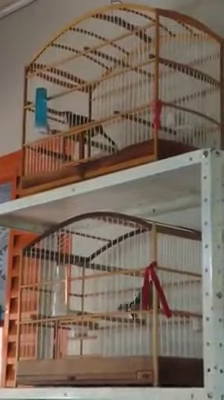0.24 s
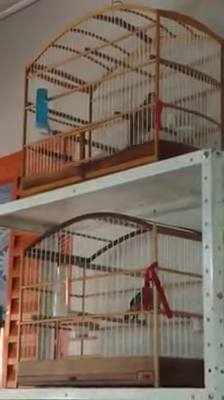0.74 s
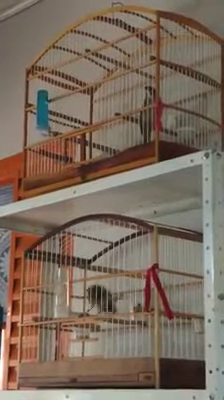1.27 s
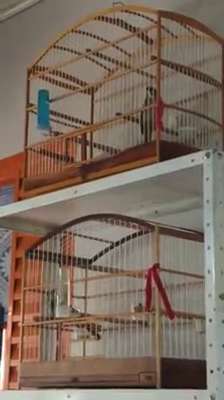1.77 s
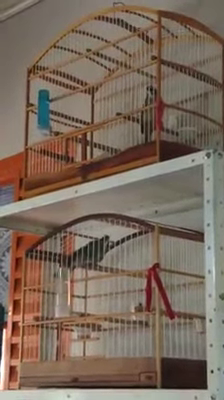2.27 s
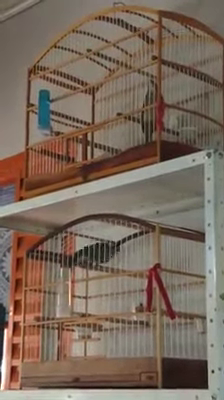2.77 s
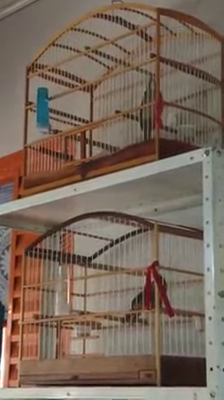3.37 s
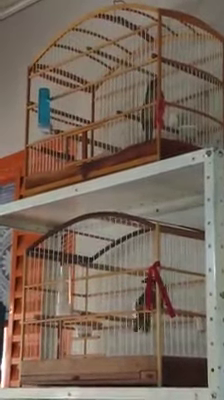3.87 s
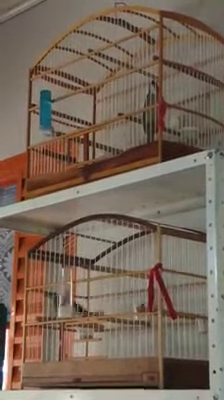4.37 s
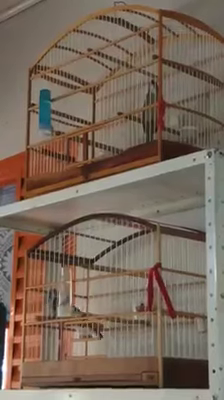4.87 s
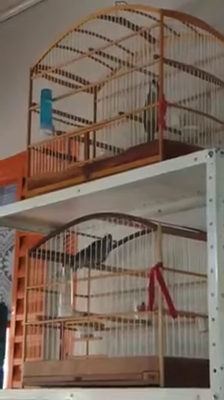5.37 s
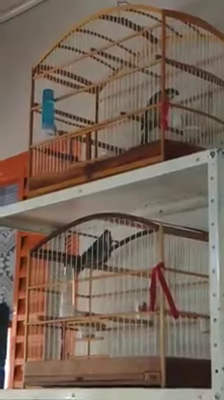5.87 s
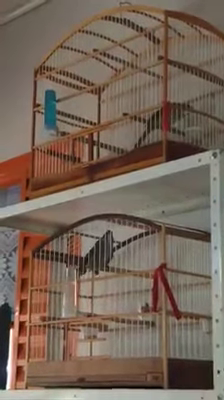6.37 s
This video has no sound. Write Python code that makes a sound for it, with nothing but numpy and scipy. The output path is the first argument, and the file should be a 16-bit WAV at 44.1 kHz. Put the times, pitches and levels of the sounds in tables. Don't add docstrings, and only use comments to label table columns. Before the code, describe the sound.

A brisk wing flutter fades at the start, then a caged bird gives one sharp falling chirp. Light claw taps and perch knocks follow. Midway comes a loud phrase: a buzzy note, then quick whistles sliding down, the last low and soft. After more hops, another single chirp. Close phone pickup in a bare, reverberant room, with muffled traffic hum outside.

```python
import sys
import numpy as np
from scipy import signal
from scipy.fft import rfft, irfft, next_fast_len
from scipy.io import wavfile
from scipy.ndimage import uniform_filter1d

SR = 44100
rng = np.random.default_rng(int(sys.argv[2]) if len(sys.argv) > 2 else 0)


def persist_wave(psi):
    counts = np.round(np.clip(psi, -1, 1) * 32767).astype(np.int16)
    wavfile.write(sys.argv[1], SR, np.atleast_2d(counts).T)


def boost_factor(decibels):
    exponent = np.asarray(decibels, float) / 20
    return 10 ** exponent


N = 292824


def at_hz(points, hz):
    points = np.array(points)
    return np.interp(np.log(np.maximum(hz, 1)), np.log(points[:, 0]), points[:, 1])


def in_time(rows):
    s, *columns = np.transpose(rows)
    return [np.interp(np.arange(N) / SR, s, column) for column in columns]


def shaped(x, gain):
    size = next_fast_len(x.shape[-1] + SR)
    hz = np.arange(size // 2 + 1) * SR / size
    return irfft(rfft(x, size) * gain(hz), size)[..., :x.shape[-1]]


def noise(spectrum):
    x = shaped(rng.standard_normal(N), lambda hz: boost_factor(at_hz(spectrum, hz)))
    return x / np.std(x)


def drift(rate_hz):
    low_pass = signal.butter(2, rate_hz, fs=SR, output="sos")
    x = signal.sosfilt(low_pass, rng.standard_normal(N + SR))[SR:]
    return x / np.std(x)


def ring(x, hz, width_hz):
    r = np.exp(-np.pi * width_hz / SR)
    poles = [1, -2 * r * np.cos(2 * np.pi * hz / SR), r * r]
    return signal.lfilter([(1 - r * r) / 2, 0, (r * r - 1) / 2], poles, x)


# time_s, pitch_hz, level_db
MOTOR_PASS = [(1.3, 250, -72), (1.42, 254.4, -59), (1.6, 244.7, -75), (1.8, 240, -58), (2.05, 238, -63),
              (2.3, 228.6, -62.5), (2.5, 211.7, -61.5), (2.62, 220, -104)]


def motor():
    hz, level_db = in_time(MOTOR_PASS)
    phase = 2 * np.pi * np.cumsum(hz * (1 + .03 * drift(36))) / SR
    return boost_factor(level_db + 1.9 * drift(9)) * (np.sin(phase) + boost_factor(-2.0) * np.sin(2 * phase))


# time_s, level_db
STREET_LEVEL = [(0, -52.5), (.24, -59), (.57, -56.5), (.91, -67), (1.13, -64.5), (1.66, -56.5),
                (2.31, -61.5), (2.8, -55.5), (3.35, -61), (3.75, -66), (4.07, -61.5), (4.27, -65.5),
                (4.9, -62.5), (5.36, -58), (5.47, -64), (5.7, -60), (6.21, -63), (6.64, -55.5)]
# pitch_hz, density_db (per Hz)
AIR_COLOUR = [(50, -30), (100, -6.5), (250, -2), (450, -9.5), (1200, -11), (1800, -12.5), (2300, -35),
              (3200, -35.5), (6000, -21.5), (9000, -27.5), (15500, -31)]
# pitch_hz, density_db (per Hz)
HUM_COLOUR = [(20, -22), (33, -17), (45, -14), (60, 6.5), (76, -1), (110, -3.5), (150, -15), (200, -32)]
# peak_s, swell_db, half_length_s
HEAVY_VEHICLES = [
    (.24, 5.5, 0.32),
    (.9, 8, 0.14),
    (2.1, 10.5, .4),
    (5.25, 2.5, 0.13),
    (6.3, 4.5, 0.25),
]
HUM_DB, HUM_FOLLOWS = -71, 0.52


def street():
    level_db, = in_time(STREET_LEVEL)
    t = np.arange(N) / SR
    swell_db = sum(db * np.exp(-((t - s) / half_s) ** 2) for s, db, half_s in HEAVY_VEHICLES)
    hum_db = HUM_DB + HUM_FOLLOWS * (level_db - level_db.mean()) + swell_db
    gusts = boost_factor(.7 * drift(5))
    hum = boost_factor(hum_db + 5.0) * noise(HUM_COLOUR)
    air = boost_factor(level_db + 3.0) * gusts * noise(AIR_COLOUR)
    return hum + air + motor()


# pitch_hz, density_db (per Hz)
FEATHER_COLOUR = [(200, -38), (600, -10), (1800, -4.5), (3100, 3.5), (4200, -1.5), (6200, -6.5),
                  (8000, -15.5), (15500, -18)]
# peak_s, peak_db, dying_db_per_s
RUSTLE_BOUTS = [
    (0, -39.5, 86.5),
    (.3, -61, 9),
    (1.499, -58.5, 11),
    (2.5, -61, 4),
    (4.6, -60.5, 32),
    (5.4, -59.5, 4),
    (5.9, -66.5, 10),
    (6.5, -62, 15),
]
BOUT_RISE_DB_S, STILL_DB = 47.5, -70.5


def rustle():
    t = np.arange(N) / SR
    power = boost_factor(STILL_DB) ** 2
    for s, peak_db, dying in RUSTLE_BOUTS:
        fall_db = np.where(t < s, BOUT_RISE_DB_S * (s - t), dying * (t - s))
        power = power + boost_factor(peak_db - fall_db) ** 2
    return np.sqrt(power) * boost_factor(1.2 * drift(12)) * noise(FEATHER_COLOUR)


# ratio (of ringing pitch), level_db, width_hz
PERCH_MODES = [
    (0.99, 7.5, 950),
    (1.1, 3, 330),
    (0.26, -18, 520),
]
LOOSE_PERCH_HOPS = (6.2, -6), [(0.4416, -45.5, 2870, -20), (0.6624, -48.5, 3050, -13),
                    (1.4894, -48, 1510, -9), (1.6789, -50, 2980, -13), (1.7607, -52, 2800, -5),
                    (2.056, -53.5, 3070, 1), (3.2725, -31, 2480, -28.5), (3.502, -26, 2930, -30.5),
                    (6.3674, -51.5, 5050, -11), (6.4251, -48.5, 3100, -3)]
FIRM_PERCH_HOPS = (13, -31), [(0.289, -50.5, 1640, -13.5), (2.4121, -60.5, 3370, 5.5),
                   (2.7846, -45.5, 3580, -16), (6.0107, -53, 2820, 6), (6.0508, -44.5, 2950, -36)]
TRAY_HOPS = (0, -21.5), [(0.9597, -50.5, 2547, 6.5), (1.6066, -45.5, 2900, -37), (2.606, -33, 1570, -4),
             (4.3351, -40.5, 1950, -24), (4.874, -62, 1730, 1), (5.7239, -36.5, 2710, 7.5)]
BAR_HOPS = (2.7, 13), [(2.1136, -46, 6630, 1), (5.3165, -45, 4200, 2.5)]


def hops():
    out, t = np.zeros(N), np.arange(2600) / SR
    spots = (LOOSE_PERCH_HOPS, FIRM_PERCH_HOPS, TRAY_HOPS, BAR_HOPS)
    landings = sorted(row + spot for spot, rows in spots for row in rows)
    scratches = rng.standard_normal((len(landings), len(t))) * np.exp(-t / 0.017)
    for (s, peak_db, hz, thud_db, ring_db, rattle_db), scratch in zip(landings, scratches):
        wood = sum(boost_factor(ring_db + db) * ring(scratch, ratio * hz, width) for ratio, db, width in PERCH_MODES)
        claws = boost_factor(3) * ring(ring(scratch, 3500, 6000), 3500, 6000)
        boom = boost_factor(2.5) * ring(scratch, 260, 120) + boost_factor(-8.5) * ring(scratch, 450, 920)
        thud = boost_factor(thud_db + 10.0) * boom
        tick = scratch * np.exp(-t / .004)
        rattle = boost_factor(rattle_db + 3) * ring(ring(tick, 10500, 8000), 10500, 8000)
        at = round(s * SR)
        out[at:at + len(t)] += boost_factor(peak_db - 6.5) * (wood + claws + thud + rattle)
    return out


ONSET_DB, END_DB = -28.5, -23
ONSET_FALL = .55
SOFT_IS_PURE = 0.25


def glides(rows, attack_s, release_s, timbre):
    notes = []
    for s, hold_s, start_hz, fall, level_db in rows:
        times = s + np.cumsum([0, attack_s, hold_s, release_s])
        pitches = start_hz - fall * np.cumsum([0, ONSET_FALL * attack_s, hold_s, release_s])
        overtone_db, top_db = timbre(pitches.mean())
        notes.append([(at, hz, level_db + db, overtone_db + SOFT_IS_PURE * db, top_db)
                      for at, hz, db in zip(times, pitches, [ONSET_DB, 0, 0, END_DB])])
    return notes


# pitch_hz, level_db
BEAK_COLOUR = [(3000, -2), (5500, -8), (6500, 1.5), (7300, -11.5), (8800, 2.5), (10800, -15.5),
               (13000, -0.5), (14800, -9), (16000, -44.5)]


def syrinx(notes, throb, wobble, rasp):
    out = np.zeros(N)
    for rows in notes:
        s, pitch, *levels = np.transpose(rows)
        at = np.arange(round(s[0] * SR), round(s[-1] * SR))
        level_db, overtone_db, top_db = (np.interp(at / SR, s, db) for db in levels)
        hz = np.exp(np.interp(at / SR, s, np.log(pitch))) * (1 + wobble[at])
        phase = 2 * np.pi * np.cumsum(hz) / SR

        def partial(k):
            return boost_factor(at_hz(BEAK_COLOUR, k * hz)) * (k * hz < 16e3) * np.sin(k * phase)

        top = boost_factor(top_db - 0.5) * sum(partial(k) for k in range(4, 8))
        upper = partial(2) + boost_factor(-10.0) * partial(3) + top
        tone = np.sin(phase) + boost_factor(overtone_db) * upper * (1 + rasp[at])
        out[at] += tone * boost_factor(level_db + 1.0) * throb[at] * signal.windows.tukey(len(at), .1)
    return out


# start_s, hold_s, start_hz, fall_hz_per_s, level_db
CALLS = [
    (.695, 0.011, 3229, 45800, -15.5),
    (5.369, 0.018, 3258, 29570, -14.5),
]
# start_s, hold_s, start_hz, fall_hz_per_s, level_db
SOFT_ANSWER = [(1.590, 0.019, 2997, 6500, -46.5)]
# time_s, pitch_hz, level_db
PHRASE_NOTES = [
    [(3.148, 2690, -48), (3.168, 2595, -25), (3.188, 2675, -15.5), (3.215, 2404, -19), (3.26, 2215, -25),
     (3.31, 2030, -23), (3.345, 1873, -31)],
    [(3.432, 2770, -54), (3.452, 3065, -16), (3.472, 3073, -16), (3.495, 2954, -10), (3.53, 2530, -14.5),
     (3.565, 2397, -25), (3.62, 2172, -25.5), (3.645, 2000, -43.5), (3.69, 1782, -37)],
    [(3.745, 4160, -62), (3.78, 3793, -28.5), (3.82, 3558, -12), (3.87, 3137, -11.5), (3.92, 2893, -16),
     (3.98, 2581, -19.5), (4.03, 2368, -29), (4.07, 2200, -46.5)],
    [(4.105, 2063, -46.5), (4.125, 2158, -29), (4.16, 1955, -27.5), (4.2, 1717, -42.5)],
]
# overtone_db, top_overtone_db
NOTE_TIMBRE = [
    (-26, 2),
    (-29, -0.5),
    (-35.5, 2),
    (-26.5, -4),
]
# start_s, hold_s, start_hz, fall_hz_per_s, level_db
BUZZED_NOTES = [
    (2.866, 0.058, 2550, 3470, -30),
    (2.876, .075, 2000, 1289, -32.5),
    (3.18, .02, 3580, 4190, -43),
    (3.48, .03, 4350, 5040, -55),
    (6.022, .03, 1844, 3730, -56),
]
# mean_pitch_hz, overtone_db, top_overtone_db
BUZZ_COLOUR = [
    (1650, 5.5, -51),
    (1939, -11, -10),
    (2400, -29.5, -10),
    (3400, -19.5, -26.5),
    (4060, -13.5, -29),
]
CALL_ATTACK_S, CALL_RELEASE_S = .011, .016
BUZZ_ATTACK_S, BUZZ_RELEASE_S = 0.024, 0.085
BUZZ_HZ, BUZZ_DEPTH = 84, .75


def song():
    throb = 1 + BUZZ_DEPTH * np.cos(2 * np.pi * BUZZ_HZ * (np.arange(N) / SR - 2.9005))
    steady, rasp = boost_factor(.6 * drift(60)), drift(350)
    whistles = glides(CALLS, CALL_ATTACK_S, CALL_RELEASE_S, lambda hz: (-19.5, -21))
    whistles += glides(SOFT_ANSWER, CALL_ATTACK_S, CALL_RELEASE_S, lambda hz: (-9.5, -25))
    whistles += [[row + timbre for row in note] for note, timbre in zip(PHRASE_NOTES, NOTE_TIMBRE)]
    pitch, overtone_db, top_db = np.transpose(BUZZ_COLOUR)
    buzzes = glides(BUZZED_NOTES, BUZZ_ATTACK_S, BUZZ_RELEASE_S,
                    lambda hz: (np.interp(hz, pitch, overtone_db), np.interp(hz, pitch, top_db)))
    clear = syrinx(whistles, steady, 0.0062 * drift(200), 0.37 * rasp)
    return clear + syrinx(buzzes, throb, 0.034 * drift(160), 0.89 * rasp)


# pitch_hz, t60_s
ROOM_DECAY = [(200, 0.93), (1500, 1), (1900, 0.83), (2200, 0.78), (2700, 0.68), (3300, 0.73), (6000, 0.68),
              (12000, 0.39)]
# delay_s, level_db
REFLECTIONS = [
    (.0042, -8.5),
    (.0085, -10),
    (0.018, -10.5),
    (0.025, -18.5),
]
ROOM_DB, EARLY_DB, EARLY_T60_S = -3.5, -5, .22


def room(x):
    t = np.arange(SR) / SR
    edges = 60 * 2 ** (np.arange(25) / 3)
    white, tail = rng.standard_normal((2, SR)), 0
    early = boost_factor(EARLY_DB - 60 * t / EARLY_T60_S)
    for k, (low, high) in enumerate(zip(edges, edges[1:])):
        band_pass = signal.butter(2, [low, high], "band", fs=SR, output="sos")
        late = boost_factor(ROOM_DB - 60 * t / at_hz(ROOM_DECAY, np.sqrt(low * high)))
        tail = tail + signal.sosfilt(band_pass, white[k % 2]) * (late + early)
    response = boost_factor(-29.5) * tail * np.clip((t - .003) / 0.0077, 0, 1)
    response[0] = 1
    for s, db in REFLECTIONS:
        response[round(s * SR)] += boost_factor(db)
    return signal.fftconvolve(x, response)[:N]


def scene():
    outside, feathers = street(), rustle()
    mono = room(boost_factor(5.5) * song() + hops()) + outside + feathers
    return np.tile(mono, (2, 1))


# pitch_hz, width_hz, depth (0-1)
NARROW_DIPS = [
    (2130, 150, .6),
    (4720, 170, .75),
    (6860, 150, .85),
    (10750, 170, .6),
]


def notched(hz):
    return np.prod([1 - depth * np.exp(-((hz - at) / width) ** 2) for at, width, depth in NARROW_DIPS], axis=0)


def gain_control(x, threshold_db=-32, share=0.34, release_db_s=22, attack_s=0.071):
    level_db = 10 * np.log10(uniform_filter1d(x ** 2, size=1024) + 1e-12)
    ramp = release_db_s * np.arange(N) / SR
    excess_db = share * np.maximum(level_db - threshold_db, 0)
    cut_db = np.maximum.accumulate(excess_db + ramp) - ramp
    r = np.exp(-1 / (attack_s * SR))
    return x * boost_factor(-signal.lfilter([1 - r], [1, -r], cut_db))


def banded(x, size, count):
    hz, _, z = signal.stft(x, SR, nperseg=size, noverlap=size * 3 // 4)
    band = np.add.reduceat(np.abs(z) ** 2, np.arange(0, len(hz), count)) / count
    return hz[:, None], z, np.repeat(band, count, axis=0)[:len(hz)]


# pitch_hz, level_db
KEPT_BANDS = [(100, -71), (1500, -72.5), (2500, -33.5), (4000, -37.5), (6000, -63.5), (7200, -24.5),
              (9000, -91.5), (11000, -36), (13000, -54), (15500, -40)]
REBUILT_HZ, TOP_HZ = 6900, 15800


def thinned_bands(x):
    hz, z, band = banded(x, size=512, count=12)
    hiss = banded(rng.standard_normal(N), size=512, count=8)[1]
    rebuilt = hiss * np.sqrt(band / np.mean(np.abs(hiss) ** 2))
    z = np.where(hz > REBUILT_HZ, rebuilt, z)
    x = signal.istft(z, SR, noverlap=384)[1][:N]
    hz, z, band = banded(x, size=2048, count=8)
    margin_db = 10 * np.log10(band / band.max(axis=0) + 1e-20) - at_hz(KEPT_BANDS, hz)
    keep = np.clip(.5 + margin_db / 3, .01, 1) * (hz < TOP_HZ)
    return signal.istft(z * keep, SR, noverlap=1536)[1][:N]


def scattered(hz):
    out = np.exp(-2j * np.pi * hz * 0.012)
    for lag_s, g in [(.0043, .5), (.0058, .45), (.0073, .4)]:
        z = np.exp(-2j * np.pi * hz * lag_s)
        out = out * (z - g) / (1 - g * z)
    return np.where(hz > 13e3, np.exp(-2j * np.pi * (hz - 13500) / 760), out)


# pitch_hz, correlation (-1 to 1)
STEREO_LIKENESS = [(60, 0.43), (400, .45), (700, 0.79), (1050, 1), (1420, 0.83), (1620, 0.15),
                   (1850, -0.54), (2170, 0.69), (2330, -0.014), (2750, 0.67), (3400, 0.74), (6500, 0.46),
                   (7200, 0.18), (12500, -0.024)]
# pitch_hz, level_db
STEREO_LEAN = [
    (60, 1.5),
    (500, 1),
    (2600, -2.5),
    (5000, -1.5),
    (8000, -0.5),
]


def spread(mono):
    def side(hz, sign):
        alike = np.clip(at_hz(STEREO_LIKENESS, hz), -.98, .98)
        mix = np.sqrt((1 + alike) / 2) + sign * np.sqrt((1 - alike) / 2) * scattered(hz)
        return boost_factor(sign * at_hz(STEREO_LEAN, hz) / 2) * mix

    return np.array([shaped(mono, lambda hz: side(hz, sign)) for sign in (1, -1)])


def top_cut(x):
    return signal.sosfilt(signal.butter(12, 15800, fs=SR, output="sos"), x)


def record(dry):
    mono = gain_control(shaped(dry[0], notched))
    stereo = spread(thinned_bands(mono))
    return top_cut(stereo)


dry = scene()
out = record(dry)
persist_wave(out)
```